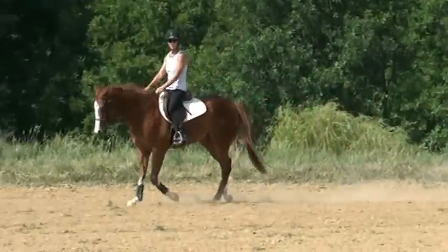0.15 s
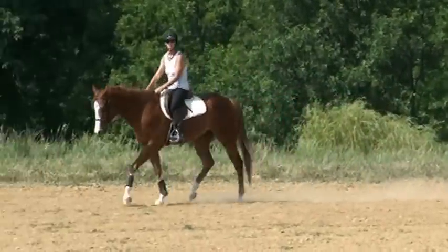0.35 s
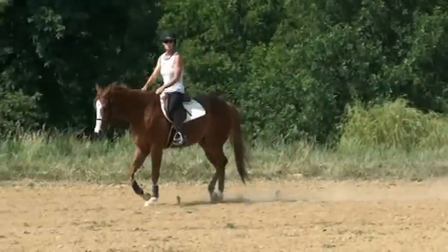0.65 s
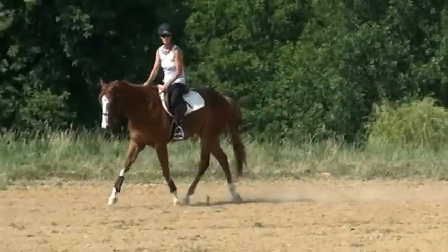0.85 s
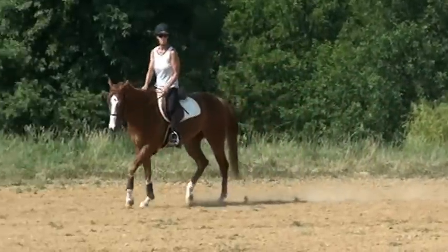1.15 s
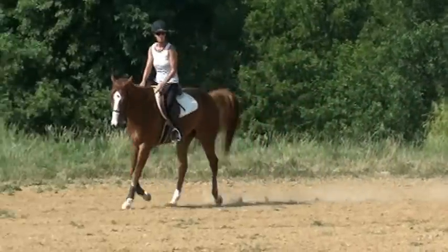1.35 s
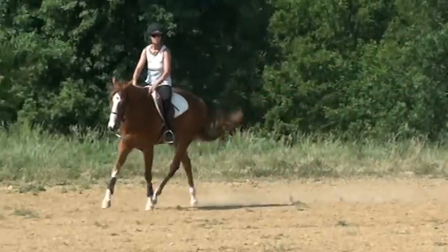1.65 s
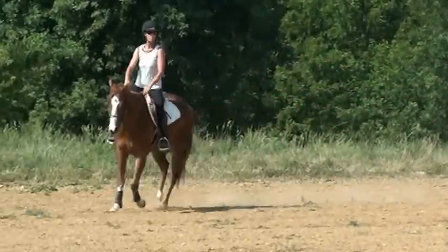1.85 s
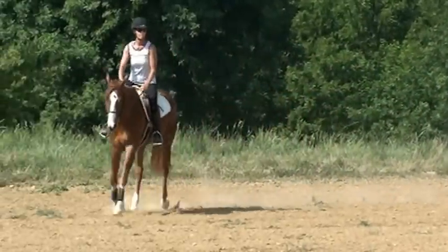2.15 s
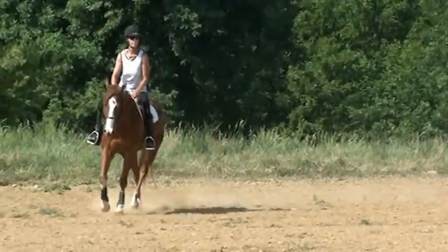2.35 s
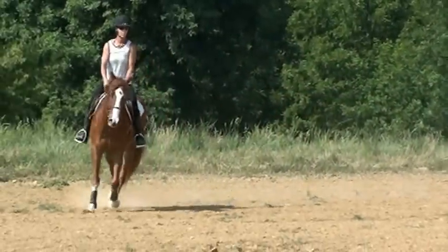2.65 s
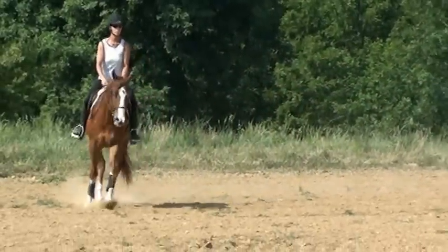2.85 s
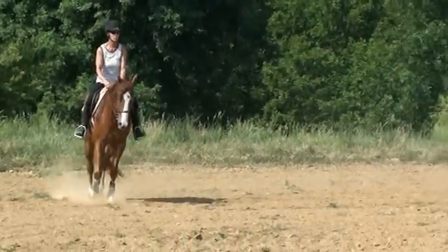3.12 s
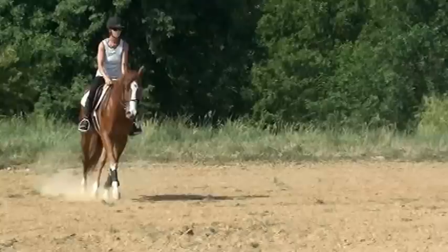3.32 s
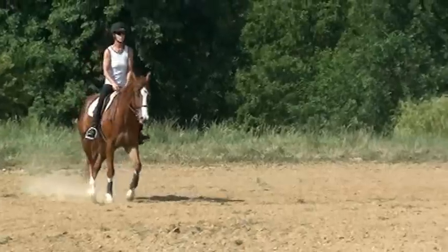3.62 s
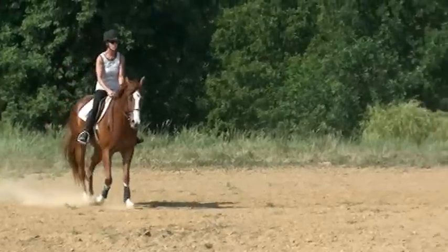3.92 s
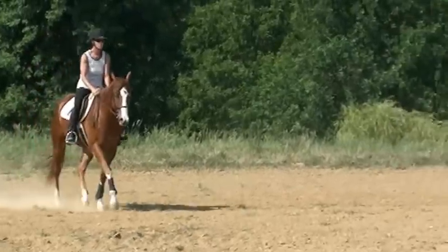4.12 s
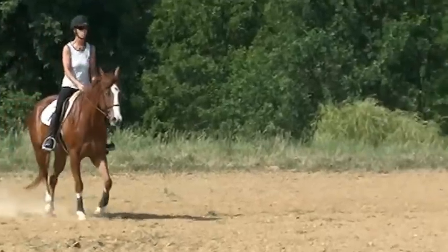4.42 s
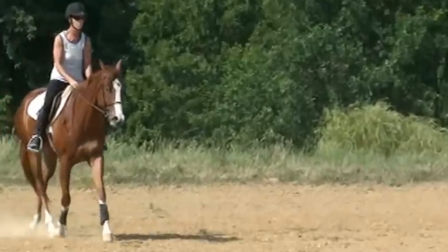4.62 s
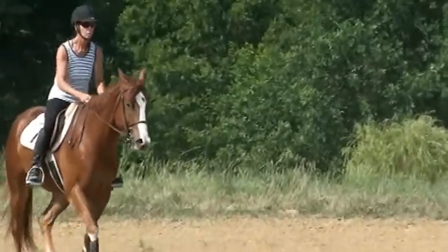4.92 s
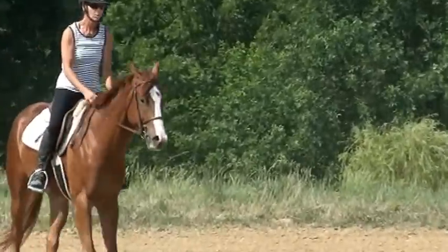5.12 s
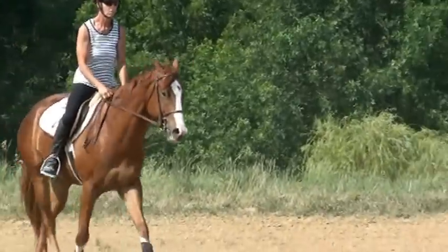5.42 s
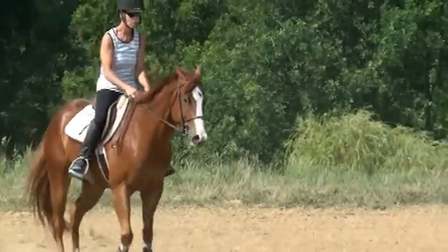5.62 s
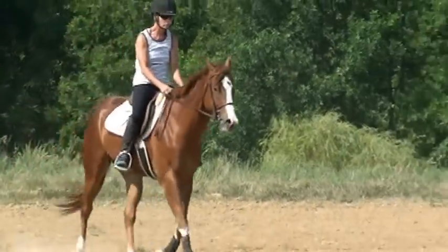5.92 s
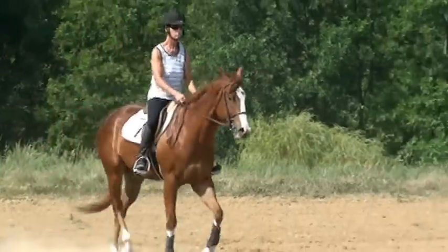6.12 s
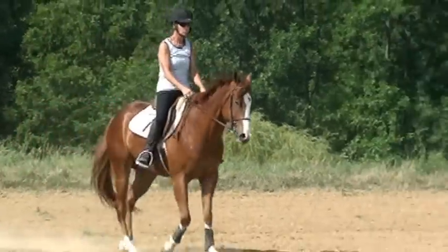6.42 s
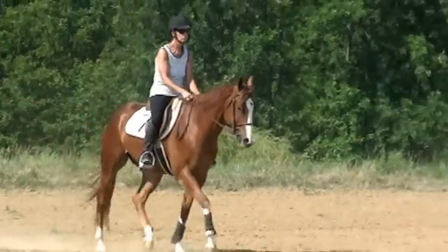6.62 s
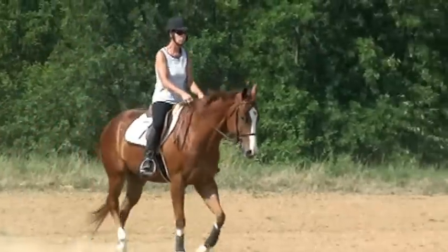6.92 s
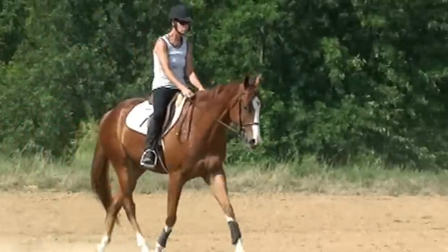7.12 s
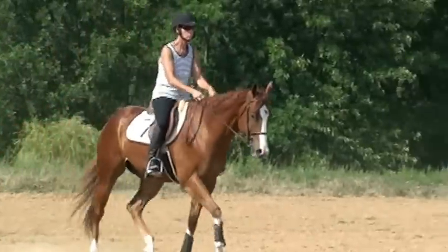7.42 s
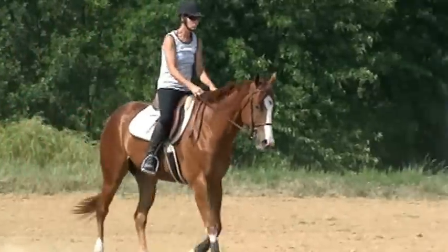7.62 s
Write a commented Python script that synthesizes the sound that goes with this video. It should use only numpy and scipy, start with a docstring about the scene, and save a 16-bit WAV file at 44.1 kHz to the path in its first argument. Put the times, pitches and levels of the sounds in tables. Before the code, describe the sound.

Soft, dull hoofbeats on sand beneath steady hiss and distant rumble, with faint birds, camera-handling rubs and ticks, and one loud plastic knock midway.

```python
"""Seen from a hand-held camera: hiss and a distant rumble (coloured noise, wavering tones) run throughout, with light breeze.
From the start fingers rub the plastic case (grains in resonances), a bird trills (gliding tones), small ticks
sound (tiny bursts) and a horse trots on sand: damped low tones for the hooves, soft noise for thrown sand.
From about 2 s knocks ring the case, the loudest near 3.3 s, followed by faint squeaks; the zoom whirrs
(narrow noise) twice from 3.8 s, and a small lever snaps back near 6.3 s with a low thump of the case."""
import sys
import numpy as np
from scipy import signal
from scipy.fft import rfft, irfft, next_fast_len
from scipy.io import wavfile
from scipy.ndimage import uniform_filter1d

SR = 44100
rng = np.random.default_rng(int(sys.argv[2]) if len(sys.argv) > 2 else 0)


def dump(signal):
    """Clip the signal to [-1, 1] and save it as 16-bit WAV at the path in sys.argv[1]."""
    limited = np.clip(np.atleast_2d(signal).T, -1, 1)
    pcm = np.round(limited * 32767).astype(np.int16)
    wavfile.write(sys.argv[1], SR, pcm)


N = 342415
TIME = np.arange(N) / SR


def amp(db):
    """Turn decibels into a gain."""
    return 10 ** (np.asarray(db) / 20)


def unit(x):
    """Scale to an average (rms) strength of 1."""
    return x / np.sqrt(np.mean(x ** 2))


def curve(rows):
    """Join (time, value) points by straight lines."""
    times, values = np.transpose(rows)
    return np.interp(TIME, times, values)


def colour(x, points):
    """Shape the spectrum by (Hz, dB) points joined along a logarithmic pitch scale."""
    point_hz, point_db = np.transpose(points)
    size = next_fast_len(N)
    hz = np.maximum(np.arange(size // 2 + 1) * SR / size, 1)
    gain = amp(np.interp(np.log(hz), np.log(point_hz), point_db))
    return irfft(rfft(x, size) * gain, size)[:N]


def band(x, hz, width):
    """One resonance, with gain 1 at its centre."""
    hz = min(hz, SR / 2 - 1000)
    sharpness = hz / min(width, SR / 4)
    return signal.lfilter(*signal.iirpeak(hz, sharpness, fs=SR), x)


def body(x, modes):
    """Drive several resonances, as a solid object rings at several pitches."""
    return sum(amp(db) * band(x, hz, width) for hz, width, db in modes)


def low_cut(x, hz):
    """Take out the bass: small things radiate little of it."""
    return signal.sosfilt(signal.butter(4, hz, "high", fs=SR, output="sos"), x)


def high_cut(x, hz):
    """Soften the treble gently, as a soft contact does."""
    return signal.sosfilt(signal.butter(2, min(hz, SR * .45), fs=SR, output="sos"), x)


def walk(rate):
    """Slow random wavering with a spread near 1; rate is new random points per second."""
    knots = rng.standard_normal(256)
    return np.interp(TIME * rate, np.arange(len(knots)), knots, period=len(knots))


def grains(size, spread_db):
    """Dense tiny impacts of very unequal strength."""
    strength_db = spread_db * np.minimum(rng.exponential(size=size), 6)
    return unit(rng.standard_normal(size) * amp(strength_db))


def swell(t, length):
    """A smooth rise and fall."""
    return np.sin(np.pi * np.clip(t / length, 0, 1))


def hold(s, length, attack_s, release_s):
    """Rise from a start time, hold, and die away after the length."""
    t = TIME - s
    return np.clip(t / attack_s, 0, 1) * np.exp(-np.maximum(t - length, 0) / release_s)


def add(track, s, sound):
    """Mix a sound in at a time in seconds."""
    i = max(int(s * SR), 0)
    track[i:i + len(sound)] += sound[:max(N - i, 0)]


def click(hz, decay_s, spread):
    """A tiny contact: a fast-dying burst in one broad resonance, scaled to peak 1."""
    t = TIME[:SR // 20]
    burst = np.sign(rng.standard_normal(len(t))) * np.exp(-t / decay_s)
    ringing = band(burst, hz, spread * hz)
    y = high_cut(low_cut(ringing, hz / 3), hz=11000)
    return y / np.abs(y).max()


def whistle(length, from_hz, to_hz, rasp):
    """One gliding tone that swells and fades; rasp shakes its pitch."""
    t = TIME[:SR // 4]
    wobble = unit(uniform_filter1d(rng.standard_normal(len(t)), size=80))
    hz = np.interp(t, [0, length], [from_hz, to_hz]) * (1 + rasp * wobble)
    return swell(t, length) * np.sin(2 * np.pi * np.cumsum(hz) / SR)


# how far the two sides differ, before each source's own trim: pitch_hz, side_minus_middle_db
STEREO_WIDTH = [(25, -15), (60, -21), (110, -24), (200, -20), (380, -4), (700, -.5), (1290, -2), (2380, -4),
                (4400, -7), (7500, -11), (10000, -19), (15000, -32)]


def stereo(source, side_db):
    """Two close microphone ports: alike in the bass and top, partly unrelated in the middle."""
    middle = source()
    side = colour(source(), STEREO_WIDTH)  # a second, independent draw
    return middle + amp(side_db) * side * np.array([[1], [-1]])


def through_shell(x, side_db):
    """Case-borne sound reaches the two ports out of step."""
    quarter_turn = np.imag(signal.hilbert(x, next_fast_len(N)))[:N]
    return x + amp(side_db) * colour(quarter_turn, STEREO_WIDTH) * np.array([[1], [-1]])


# colour of the hiss: pitch_hz, relative_level_db (per Hz)
AIR_COLOUR = [(40, -11), (120, -2.5), (280, -2), (400, -8.5), (560, -11.5), (800, -11), (1200, -12.5),
              (2100, -15.5), (3200, -17), (5000, -18), (7000, -18.5), (9000, -21), (12000, -21.5),
              (15500, -23)]
AIR_DB = -53.5


def air():
    """Even hiss of distant leaves and of the microphone: coloured noise that sways very slightly."""
    sway_db = .25 * walk(rate=1.5)
    return unit(colour(rng.standard_normal(N), AIR_COLOUR)) * amp(AIR_DB + sway_db)


# colour of the deep part of the rumble: pitch_hz, relative_level_db
DEEP_COLOUR = [(20, -30), (35, -24), (50, -10), (66, 1), (86, 11.5), (102, 4), (120, 7), (150, -24),
               (220, -40), (600, -72)]
# level of the deep part, before its random waver: time_s, level_db
DEEP_LEVEL_POINTS = [(0, -53), (1.4, -55.5), (1.7, -52.5), (2.7, -56.5), (3.6, -53), (4.4, -54), (5.2, -52),
                     (7.76, -50.8)]
# colour of the noise in the drone above it: pitch_hz, relative_level_db
DRONE_COLOUR = [(70, -38), (115, -11), (138, -1), (152, 2.5), (175, -2), (200, -4), (240, -11.5),
                (300, -21.5), (420, -32.5), (800, -59), (2000, -83)]
# level of the drone noise, before throb and waver: time_s, level_db
DRONE_LEVEL_POINTS = [(0, -44.5), (1.5, -44.7), (1.68, -48), (2.2, -46.3), (2.7, -50), (3.35, -53),
                      (4.8, -51.5), (6.5, -49.5), (7.76, -51.5)]
# narrow tones that sing in the drone: pitch_hz, pitch_wander_hz, relative_level_db
SINGING_TONES = [(150.5, 5, 0), (173, 5, -6), (237, 5, -12), (301, 6, -21)]
DRONE_TONE_DB = -7  # all tones together, against the drone noise
DEEP_WAVER_DB, DRONE_WAVER_DB = 1.0, .6
# the throb: swells per second, time of one crest, depth at the start, time scale of its fading
THROB_HZ, THROB_CREST_S, THROB_DB, THROB_FADE_S = 2.7, .39, 2.6, 2.6


def rumble():
    """Far-off machinery or traffic: deep noise and a drone with wavering tones, whose throb fades."""
    depth_db = THROB_DB * np.exp(-(TIME / THROB_FADE_S) ** 2)
    throb_db = depth_db * np.cos(2 * np.pi * THROB_HZ * (TIME - THROB_CREST_S))
    deep_db = curve(DEEP_LEVEL_POINTS) + DEEP_WAVER_DB * walk(rate=6)
    deep = unit(colour(rng.standard_normal(N), DEEP_COLOUR)) * amp(deep_db)
    tones = np.zeros(N)
    for hz, wander_hz, db in SINGING_TONES:
        pitch = hz + wander_hz * walk(rate=20)
        tones += amp(db) * np.sin(2 * np.pi * np.cumsum(pitch) / SR)
    drone = unit(colour(rng.standard_normal(N), DRONE_COLOUR)) + amp(DRONE_TONE_DB) * unit(tones)
    drone_db = curve(DRONE_LEVEL_POINTS) + throb_db + DRONE_WAVER_DB * walk(rate=6)
    return deep + drone * amp(drone_db)


# colour of the breeze: pitch_hz, relative_level_db
BREEZE_SPECTRUM = [(20, -18), (70, -6), (140, 0), (260, -3), (500, -29), (1500, -64)]
# puffs of breeze on the microphone ports: middle_s, length_s, level_db
BREEZE_PUFFS = [(0.472, .04, -57), (3.57, .1, -55), (5.5, .05, -54), (6.64, 0.14, -50.5)]
CALM_DB = -72.5  # level between puffs


def breeze():
    """Light air eddies at each port on its own, with a few short puffs."""
    strength = amp(CALM_DB)
    for middle_s, length, db in BREEZE_PUFFS:
        strength = strength + amp(db) * swell(TIME - middle_s + length / 2, length)
    ports = [unit(colour(rng.standard_normal(N), BREEZE_SPECTRUM)) for _ in range(2)]
    return np.array(ports) * strength


# the hand shifts its grip, before rub_db and the unsteadiness: start_s, length_s, level_db
GRIP_SHIFTS = [(0, .25, -64), (0.768, 0.066, -58.5), (1.386, 0.073, -61.5), (2.678, 0.43, -64),
               (3.37, .16, -59), (4.69, .15, -55.5), (4.93, .16, -56.5), (5.377, .5, -59.5),
               (6.29, .2, -57.5), (6.577, .1, -65), (6.948, .3, -64.5)]
# what the gripping hand makes ring: pitch_hz, width_hz, relative_level_db
GRIP_RESONANCES = [(1093, 83, 8), (1540, 810, 5.5), (2284, 114, 7), (3100, 1100, -6), (4830, 91, 5),
                   (6600, 2200, 2.5), (7500, 250, -7.5), (9200, 1400, -36.5)]
# short finger slips, before slip_db: middle_s, length_s, level_db
FINGER_SLIPS = [(2.793, 0.078, -52), (2.909, 0.042, -44.5), (3.055, 0.036, -53.5), (3.098, 0.036, -49),
                (3.126, .03, -56), (5.011, 0.023, -54), (5.787, 0.026, -48.5), (5.849, 0.046, -57),
                (5.984, 0.043, -51), (6.435, 0.04, -54), (6.489, 0.048, -54)]
# what a slipping finger makes ring: pitch_hz, width_hz, relative_level_db
SLIP_RESONANCES = [(1330, 240, 0), (3300, 700, -22), (6100, 700, -17), (7500, 1100, -19)]
RUB_ATTACK_S, RUB_RELEASE_S = .06, .055
RESTING_HAND_DB = -71  # constant faint rub, also before rub_db


def fingers(slip_db=1.0, rub_db=0.1):
    """Skin sticks and slips on plastic: dense grains in the resonances of the case."""
    pressure = sum(amp(db) * swell(TIME - middle_s + length / 2, length)
                   for middle_s, length, db in FINGER_SLIPS)
    grip = amp(RESTING_HAND_DB) + sum(amp(db) * hold(s, length, RUB_ATTACK_S, RUB_RELEASE_S)
                                      for s, length, db in GRIP_SHIFTS)
    slips = unit(low_cut(body(grains(N, spread_db=4.4), SLIP_RESONANCES), hz=1000))
    rub = unit(low_cut(body(grains(N, spread_db=5.0), GRIP_RESONANCES), hz=900))
    unsteady_db = 2.2 * walk(rate=30)
    both = amp(slip_db) * pressure * slips + grip * rub * amp(rub_db + unsteady_db)
    return high_cut(both, hz=9900)


# bird calls, before echoes: start_s, length_s, start_hz, end_hz, level_db, rasp (share of the pitch)
BIRD_CALLS = [(.546, .11, 6320, 6420, -56.5, .025), (.833, 0.053, 4850, 4680, -48.5, .007),
              (1.179, .05, 4760, 4620, -53.5, .005), (1.995, .027, 4930, 4830, -51.5, .012),
              (2.006, 0.074, 3560, 3620, -54, .011), (2.0, .065, 7100, 7200, -59.5, .012),
              (2.017, 0.078, 4500, 4390, -54.5, 0.05), (2.082, .13, 4160, 2556, -55.5, .035),
              (2.167, .12, 4240, 3290, -59, .09), (2.31, .03, 5900, 5700, -58, .005),
              (2.488, .03, 3980, 4060, -57, .005), (2.544, .05, 5230, 5560, -59, .023),
              (2.729, .06, 4000, 4080, -58, .01), (3.761, .11, 4120, 3970, -57.5, .028),
              (3.859, .09, 3430, 3020, -56, .035), (3.971, 0.16, 2950, 3030, -63, .06),
              (7.6, .19, 7700, 7900, -64, .016)]
# one bird opens with a thin trill of even upslurs, each a little louder
TRILL_COUNT = 8
TRILL_START_S, TRILL_STEP_S, TRILL_NOTE_S = .011, .0655, .028
TRILL_FROM_HZ, TRILL_TO_HZ, TRILL_RASP = 6850, 7240, .008
TRILL_DB, TRILL_GROWTH_DB = -63, 0.4  # first note; gain per note


def birds(echo_db=-5, echo_s=0.05):
    """A trill and gliding whistles, some pure and some rasping, smeared by echoes off trunks and leaves."""
    calls, t = np.zeros(N), TIME[:SR // 4]
    for k in range(TRILL_COUNT):
        upslur = whistle(TRILL_NOTE_S, TRILL_FROM_HZ, TRILL_TO_HZ, TRILL_RASP)
        add(calls, TRILL_START_S + k * TRILL_STEP_S, amp(TRILL_DB + k * TRILL_GROWTH_DB) * upslur)
    for s, length, from_hz, to_hz, db, rasp in BIRD_CALLS:
        add(calls, s, amp(db) * whistle(length, from_hz, to_hz, rasp))
    trees = rng.standard_normal(len(t)) * np.exp(-t / echo_s)
    echoes = signal.fftconvolve(calls, trees / np.linalg.norm(trees))[:N]
    return calls + amp(echo_db) * echoes


# the clearest dry ticks: start_s, peak_db, pitch_hz
CLEAR_TICKS = [(.078, -41.5, 3220), (.921, -41.5, 3370), (1.1595, -36.5, 8200), (1.379, -42, 7500),
               (1.539, -41.5, 6500), (2.747, -41, 6960), (2.9503, -43, 6040), (3.608, -42.5, 3760),
               (3.847, -40, 7700), (4.5683, -37, 6600), (4.8053, -38, 7000), (5.2267, -41, 6500),
               (5.4474, -38, 2320), (5.4802, -38.5, 3260), (5.778, -40, 6440), (5.8944, -37, 4940),
               (6.578, -41.5, 4350), (6.616, -41, 4500), (7.0247, -37.5, 7500)]
# a small lever snaps back and chatters: start_s, peak_db (before its treble is softened), pitch_hz, decay_s
LEVER_CLICKS = [(6.3426, -15, 7100, .00035), (6.3440, -24, 6600, .0007), (6.343, -30, 2150, .0025),
                (6.3480, -27, 7800, .001), (6.3498, -27.5, 7800, .0022)]
# fainter ticks at random times, their pitch scattered up to so many octaves either way
STRAY_TICK_COUNT = 14
STRAY_TICK_DB, STRAY_TICK_HZ, STRAY_TICK_OCTAVES = -46, 6000, 0.37


def ticks(tick_spread=.45, lever_spread=0.27, tick_s=0.0019, lever_top_hz=12500):
    """Tiny contacts, each a short burst in one resonance: ticks, faint strays, and the lever."""
    out = np.zeros(N)
    for s, db, hz in CLEAR_TICKS:
        add(out, s, amp(db) * click(hz, tick_s, tick_spread))
    for s, db, hz, decay_s in LEVER_CLICKS:
        add(out, s, amp(db) * high_cut(click(hz, decay_s, lever_spread), lever_top_hz))
    for when, pitch in rng.random((STRAY_TICK_COUNT, 2)):
        hz = STRAY_TICK_HZ * 2 ** (STRAY_TICK_OCTAVES * (2 * pitch - 1))
        add(out, when * N / SR, amp(STRAY_TICK_DB) * click(hz, tick_s, tick_spread))
    return out


# hoof falls, and one low thump of the case at 6.361 s: start_s, thud_db, soft_noise_db (thrown sand for a hoof)
THUDS = [(.079, -52, -62), (.464, -40.5, -63), (.715, -48, -53), (1.327, -42, -64), (1.644, -56, -58.5),
         (2.136, -43, -52.5), (2.944, -43.5, -60), (3.737, -35, -63), (4.125, -48, -68), (4.29, -42, -59),
         (5.045, -41.5, -60), (5.19, -45.5, -64), (5.63, -48, -55.5), (5.856, -50, -55), (6.361, -39, -53),
         (6.426, -41, -52), (7.011, -45, -57), (7.479, -46.5, -54), (7.6, -43.5, -56)]
# a heavier hoof packs more sand and sounds lower: pitch at a typical strength, and its fall with strength
THUD_HZ, TYPICAL_THUD_DB, THUD_OCTAVES_PER_DB = 345, -44, .035


def hooves_and_case_thump(thud_s=0.0028, noise_hz=950, noise_width=700, noise_s=0.0097, noise_top_hz=2600):
    """A hoof packs sand with a damped thud and grains scatter; the case thump is built the same way."""
    out, t = np.zeros(N), TIME[:SR // 4]
    for s, db, noise_db in THUDS:
        lightness_db = min(TYPICAL_THUD_DB - db, 2)  # light thuds rise in pitch only so far
        hz = THUD_HZ * 2 ** (THUD_OCTAVES_PER_DB * lightness_db)
        push = t / thud_s * np.exp(1 - t / thud_s)
        thud = push * np.sin(2 * np.pi * (hz * t + rng.random()))
        spray = high_cut(band(grains(len(t), spread_db=4.5), noise_hz, noise_width), noise_top_hz)
        soft_noise = unit(spray) * t / noise_s * np.exp(1 - t / noise_s)
        add(out, s, amp(db) * thud + amp(noise_db) * soft_noise)
    return out


# knocks on the case: start_s, peak_db (before the after-ring), hardness_hz (treble limit of the contact)
CASE_KNOCKS = [(2.146, -39, 1800), (2.746, -29, 1200), (3.095, -44, 1400), (3.2840, -8.5, 15000),
               (3.2975, -36, 800), (4.804, -40.5, 2000), (5.05, -29.5, 2800), (5.183, -42, 1400),
               (5.781, -39.5, 1500), (6.3418, -41, 1000), (6.4207, -47, 2000)]
# what the case rings with: pitch_hz, width_hz, relative_level_db
CASE_RESONANCES = [(610, 340, -9.5), (1056, 143, 1), (1250, 220, 0.5), (2090, 83, 0), (2410, 95, -3),
                   (2950, 270, -1), (3740, 150, -3), (4440, 250, -6), (5660, 230, -6), (6370, 220, -1),
                   (7630, 280, -5), (8750, 240, -4), (10500, 360, -3), (12100, 420, -12),
                   (13700, 1300, -16)]
# small metal parts that ring on: pitch_hz, level_db (against the knock's peak), time_to_fall_60_db_s
METAL_RING = [(1082, -33, .16), (2638, -50, .2), (6690, -53, .3)]


def knocks(crush_s=0.00036, crush=0.06, cut_hz=650):
    """The case is knocked: softer contacts excite mostly its low modes; metal parts ring on faintly."""
    out, t = np.zeros(N), TIME[:SR // 3]
    for s, db, hard_hz in CASE_KNOCKS:
        push = crush * rng.standard_normal(len(t)) * np.exp(-t / crush_s)
        push[0] += 1
        push = high_cut(push, hard_hz)
        # neighbouring modes of the shell move in opposite directions
        shell = sum((-1) ** k * body(push, [mode]) for k, mode in enumerate(CASE_RESONANCES))
        knock = low_cut(shell, cut_hz)
        ring = sum(amp(level - 60 * t / t60) * np.sin(2 * np.pi * hz * t) for hz, level, t60 in METAL_RING)
        add(out, s, amp(db) * (knock / np.abs(knock).max() + ring))
    return out


# faint squeaks of the case as the pressure eases after a click: start_s, length_s, pitch_hz, level_db
CASE_SQUEAKS = [(3.32, .022, 6720, -56), (3.325, .03, 4700, -57), (5.06, .072, 2840, -56),
                (6.371, .024, 6700, -53), (6.408, .022, 7080, -58)]
SQUEAK_RASP = 0.0065  # share of the pitch


def squeaks():
    """Plastic creeps on plastic: a short tone with a nearly steady pitch."""
    out = np.zeros(N)
    for s, length, hz, db in CASE_SQUEAKS:
        add(out, s, amp(db) * whistle(length, hz, hz, SQUEAK_RASP))
    return out


# runs of the zoom motor: start_s, length_s, level_db
ZOOM_RUNS = [(3.828, .51, -57), (4.498, 0.27, -59.5)]
ZOOM_SPIN_UP_S, ZOOM_RUN_DOWN_S = 0.043, .04


def zoom():
    """The lens drive whirrs, low and rough: noise through two close resonances."""
    whirr = band(band(rng.standard_normal(N), hz=435, width=165), hz=432, width=260)
    strength = sum(amp(db) * hold(s, length, ZOOM_SPIN_UP_S, ZOOM_RUN_DOWN_S) for s, length, db in ZOOM_RUNS)
    return unit(whirr) * strength


def scene():
    """The arena, and the camera in the hand."""
    background = stereo(air, side_db=1) + stereo(rumble, side_db=-6.5) + breeze()
    events = stereo(birds, side_db=-5.5) + stereo(hooves_and_case_thump, side_db=-10)
    handling = stereo(fingers, side_db=-3) + through_shell(ticks(), side_db=-2)
    handling = handling + through_shell(knocks(), side_db=-1.5) + squeaks()
    return background + events + handling + stereo(zoom, side_db=-11)


TOP_HZ = 15800


def record(dry):
    """The recorder cuts the top steeply."""
    return signal.sosfilt(signal.ellip(10, .1, 70, TOP_HZ, fs=SR, output="sos"), dry)


dry = scene()
out = record(dry)
dump(out)
```